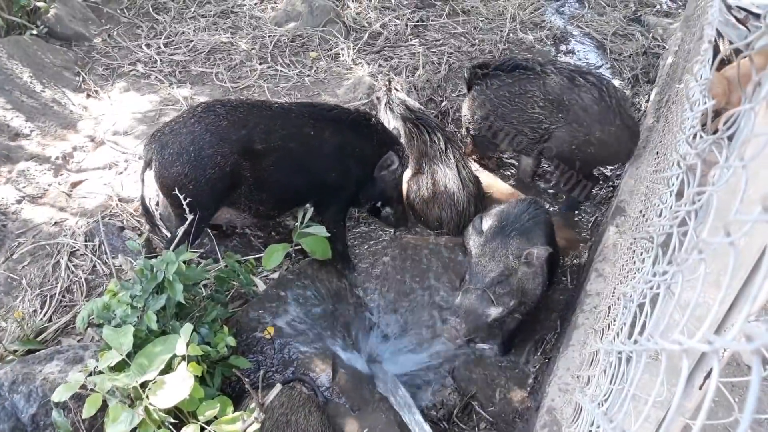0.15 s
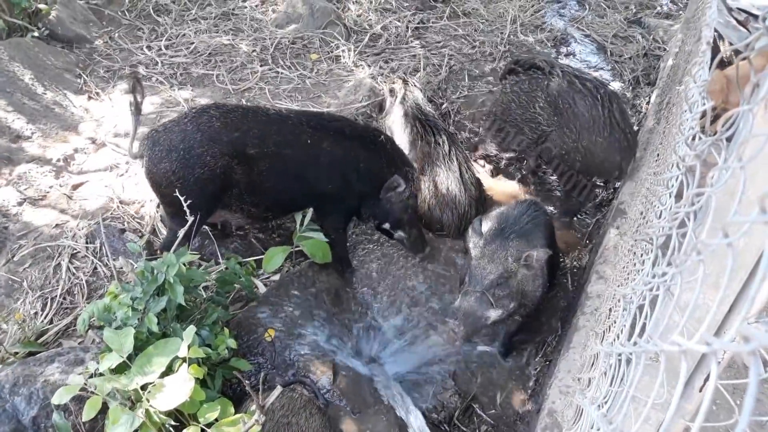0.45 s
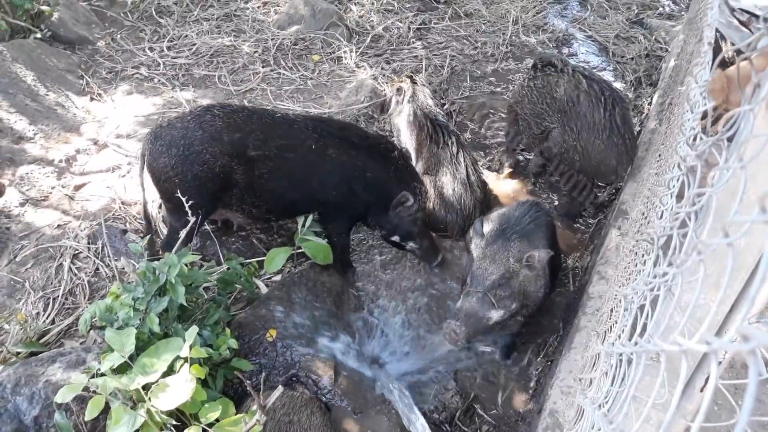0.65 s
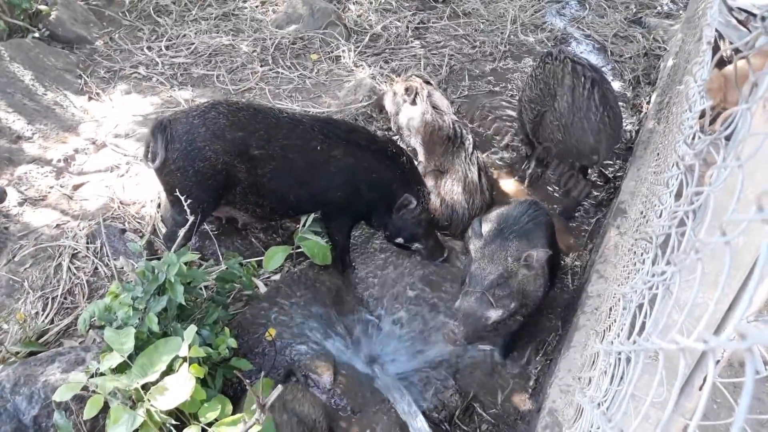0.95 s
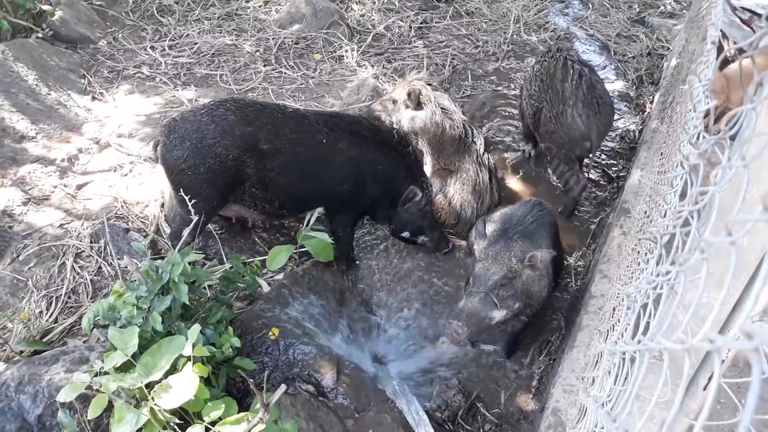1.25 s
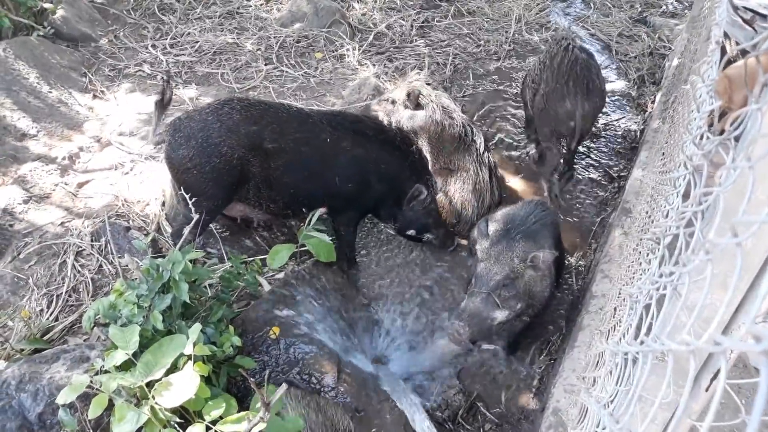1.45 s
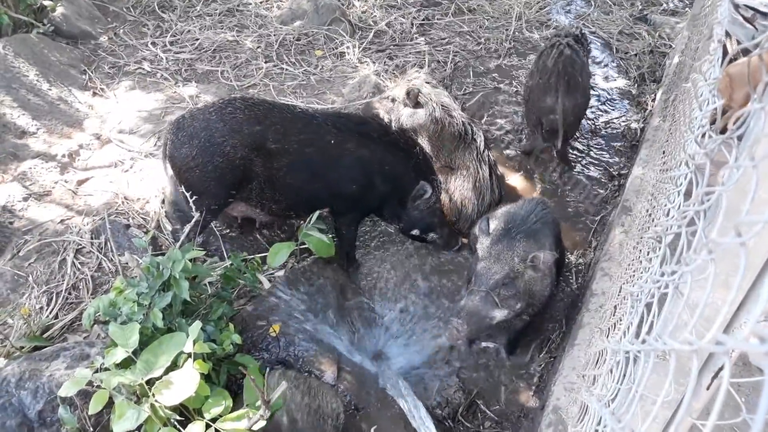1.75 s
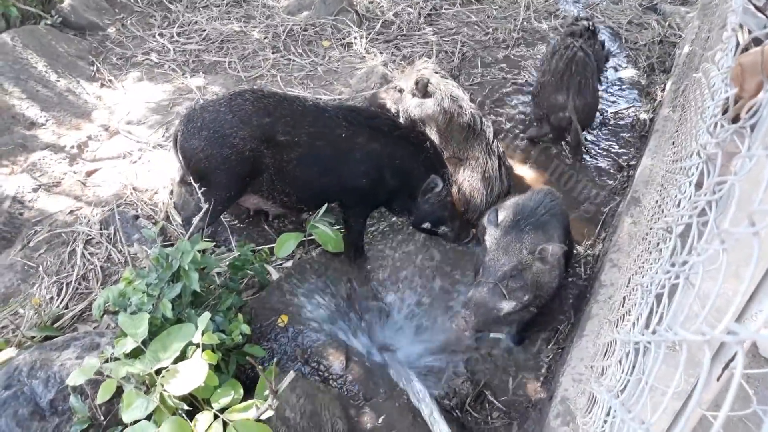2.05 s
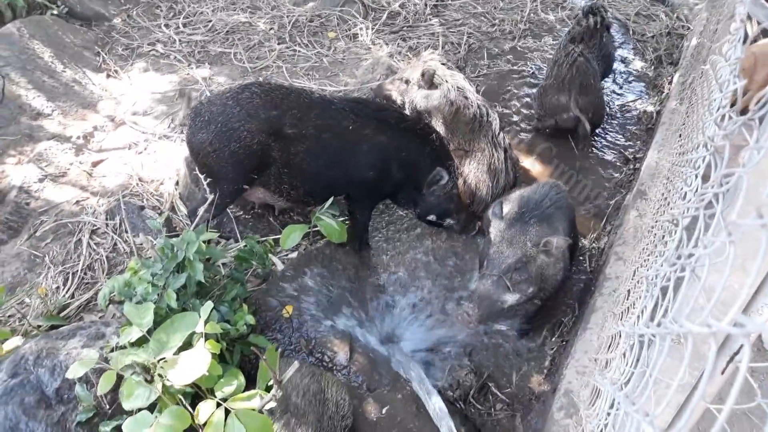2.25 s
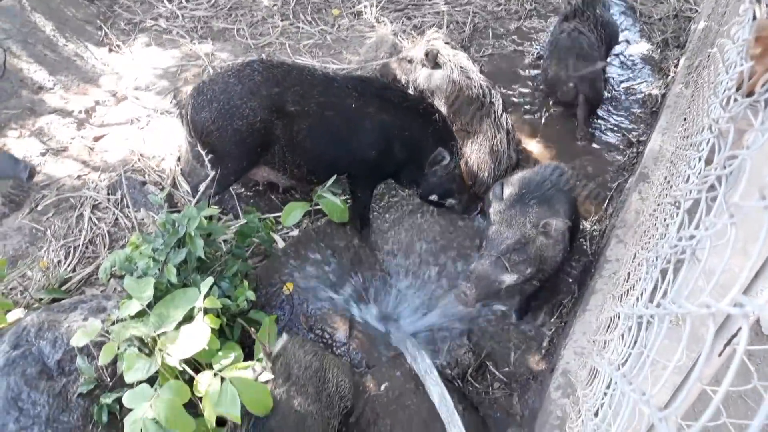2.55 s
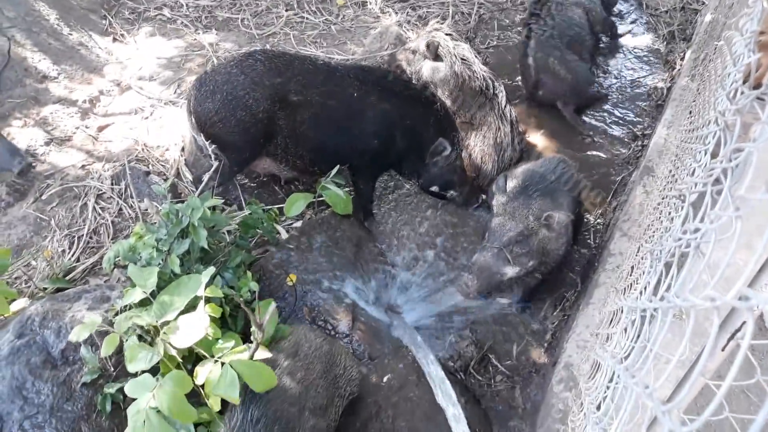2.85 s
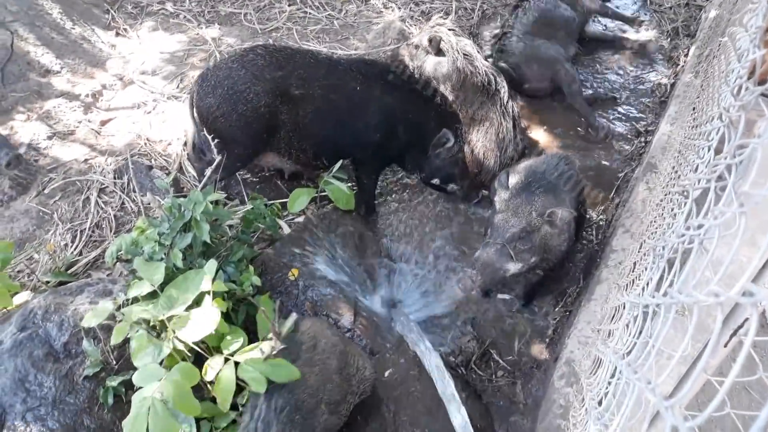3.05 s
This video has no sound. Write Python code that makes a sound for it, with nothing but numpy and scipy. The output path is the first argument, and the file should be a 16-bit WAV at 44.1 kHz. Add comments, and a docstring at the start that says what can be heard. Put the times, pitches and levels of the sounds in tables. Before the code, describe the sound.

Continuous bright water spray hisses and bubbles close by in an open pen, with irregular slaps, spits and faint plops; low wind thumps bump the small mono microphone in clusters, and one hard water smack falls near the end.

```python
"""Hose jet on wet mud and hides

An outdoor pen, heard by a single small microphone: a jet splashes on wet mud and hides.
The splash is a hiss of fine spray (flickering noise), pattering drops and small bubbles (many short tones),
with slaps, bright spits and one big smack (dying bursts of noise and tones) and low plops (climbing tones).
A gusty breeze rumbles (lumpy low noise) and thumps (single swings of sagging pitch) in the microphone's port."""
import sys
import numpy as np
from scipy import signal
from scipy.fft import rfft, irfft
from scipy.io import wavfile
from scipy.ndimage import uniform_filter1d

SR = 44100
rng = np.random.default_rng(int(sys.argv[2]) if len(sys.argv) > 2 else 0)


def convert_level_to_amplitude(level_db):
    """Map a level in decibels to its linear amplitude factor."""
    exponent = np.asarray(level_db, float) / 20
    return 10 ** exponent


def persist_wave(psi):
    """Save psi, clipped to +-1, as 16-bit WAV."""
    counts = np.round(np.clip(psi, -1, 1) * 32767).astype(np.int16)
    wavfile.write(sys.argv[1], SR, np.atleast_2d(counts).T)


N = 141120  # length in samples, 3.2 s


def evened(x):
    """Scales to rms 1."""
    return x / np.sqrt(np.mean(x ** 2) + 1e-20)


def curve(rows, column=1):
    """Reads a column of a time table at every sample, in straight lines between rows."""
    rows = np.array(rows)
    return np.interp(np.arange(N) / SR, rows[:, 0], rows[:, column])


def colour(x, points):
    """Filters by a spectrum table, in straight lines of dB over log frequency."""
    table_hz, table_db = np.transpose(points)
    hz = np.fft.rfftfreq(len(x), 1 / SR)
    gain_db = np.interp(np.log(hz + 1), np.log(table_hz + 1), table_db)
    return irfft(rfft(x) * convert_level_to_amplitude(gain_db), len(x))


def add(mix, start_s, sound):
    """Mixes a sound in at a time in seconds."""
    part = mix[max(round(start_s * SR), 0):][:len(sound)]
    part += sound[:len(part)]


def blip(hz, cycles, rise):
    """A tone that dies by 30 dB in the given cycles, while its pitch climbs by the fraction rise."""
    u = np.arange(4000) / SR * hz / cycles
    onset = 1 - np.exp(-u / 0.014)
    turns = cycles * (u + rise * u ** 2 / 2)
    return onset * convert_level_to_amplitude(-30 * u) * np.sin(2 * np.pi * turns)


def grains(per_s, spread_db, cycles, rise, lo_hz, hi_hz, count=30):
    """Many small tones at random times, of scattered size, evenly spread over count pitches."""
    happens = rng.random(N) < per_s / SR
    size = convert_level_to_amplitude(spread_db * np.minimum(rng.exponential(1, N), 4)) * happens
    kind = rng.integers(0, count, N)
    total = np.zeros(N)
    for k, hz in enumerate(np.linspace(lo_hz, hi_hz, count)):
        tone = np.sqrt(hz) * blip(hz, cycles, rise)  # shorter high tones get equal energy
        total += signal.oaconvolve(size * (kind == k), tone)[:N]
    return evened(total)


def burst(db, hz, t60, width):
    """Noise through a resonance at hz, width * hz wide, dying 60 dB in t60 seconds; db is its peak."""
    t = np.arange(3000) / SR
    r = np.exp(-np.pi * width * hz / SR)
    poles = [1, -2 * r * np.cos(2 * np.pi * hz / SR), r * r]
    ring = signal.lfilter([1, 0, -1], poles, rng.standard_normal(len(t)))
    ring = ring * np.minimum(t / 0.00049, 1) * convert_level_to_amplitude(-60 * t / t60)
    return convert_level_to_amplitude(db) * ring / np.abs(ring).max()


# How strongly the breeze rumbles in the port. Each row: time in seconds, level in dB.
RUMBLE_LEVEL = [(0, -36), (.07, -53), (.11, -57), (.27, -45.5), (.33, -47), (.5, -41), (.72, -44),
                (.77, -42), (.81, -33), (.9, -36), (.96, -50), (1.01, -37), (1.04, -36), (1.1, -44),
                (1.15, -46.5), (1.32, -45), (1.42, -40.5), (1.55, -52), (1.7, -44.5), (1.76, -54.5),
                (1.88, -60), (2.15, -44.5), (2.2, -50), (2.3, -42.5), (2.6, -44.5), (2.91, -43),
                (3.04, -32), (3.1, -39.5), (3.2, -52)]
# Spectrum of that rumble. Each row: frequency in Hz, relative noise density in dB per Hz.
RUMBLE_COLOUR = [(20, -34), (50, -4.5), (80, 2), (120, 1), (200, -7.5), (300, -13.5), (500, -20.5),
                 (900, -37)]


def wind_rumble():
    """Low noise of the breeze, swelling in short lumps and following the gusts."""
    lump_db, lump_s = 4, 0.012  # rms of the lumps, half-width of their smoothing bell
    t = np.arange(-2000, 2000) / SR
    bell = np.exp(-(t / lump_s) ** 2)
    lumps = evened(signal.oaconvolve(rng.standard_normal(N), bell, "same"))
    rumble = colour(rng.standard_normal(N), RUMBLE_COLOUR) * convert_level_to_amplitude(lump_db * lumps)
    return convert_level_to_amplitude(curve(RUMBLE_LEVEL)) * evened(rumble)


# Single thumps of wind in the port.
# Each row: middle in seconds, level in dB, pitch at the middle in Hz, width in seconds.
WIND_THUMPS = [(0.0313, -31.5, 145, 0.0082), (0.055, -33, 103, 0.0125), (0.4213, -28, 120, 0.0101),
               (0.437, -28, 129, 0.0099), (0.466, -30, 101, 0.036), (0.507, -22.5, 141, 0.0098),
               (0.5558, -33, 126, 0.013), (0.5747, -31, 161, 0.011), (0.598, -29, 190, 0.01),
               (0.654, -32, 114, 0.0052), (0.6686, -24, 175, 0.011), (0.6937, -27, 168, 0.0076),
               (0.7062, -24.5, 118, 0.019), (0.7913, -20, 147, 0.0068), (0.8097, -26, 110, 0.01),
               (0.8191, -11, 187, 0.0063), (0.825, -25, 190, 0.0035), (0.8358, -26.5, 156, 0.006),
               (0.848, -13.5, 165, 0.0029), (0.8836, -16.5, 171, 0.0047), (0.89, -21.5, 149, 0.0073),
               (0.981, -23, 150, 0.0081), (0.999, -12.5, 400, 0.0065), (1.01, -22, 90, 0.014),
               (1.0228, -14.5, 244, 0.0034), (1.034, -22, 234, 0.011), (1.0466, -22.5, 197, 0.008),
               (1.0627, -27, 120, 0.014), (1.0827, -27.8, 163, 0.0053), (1.3487, -28.5, 145, 0.0083),
               (1.3602, -34, 128, 0.0079), (1.394, -34, 175, 0.0039), (1.409, -24, 116, 0.013),
               (1.4546, -26, 178, 0.016), (1.6263, -32.5, 118, 0.013), (1.6924, -28, 148.3, 0.013),
               (2.251, -33, 120, 0.028), (2.277, -29, 151, 0.0089), (2.4238, -20.5, 144, 0.0085),
               (2.4542, -32, 124, 0.0108), (2.5141, -30.5, 114, 0.0103), (2.5297, -32.5, 132, 0.0094),
               (2.64, -22, 209, 0.011), (2.666, -24.5, 118, 0.0085), (2.752, -32, 128, 0.0064),
               (2.7784, -31, 178.4, 0.0085), (2.8084, -22, 119, 0.011), (2.8703, -26, 182, 0.012),
               (2.9349, -30, 201, 0.0072), (2.9514, -21, 149, 0.0046), (2.966, -21, 129, 0.008),
               (2.9822, -25, 116, 0.017), (2.9954, -32, 177, 0.0059), (3.006, -28.5, 127, 0.0055),
               (3.0371, -17, 147.5, 0.017), (3.0626, -18, 195, 0.0075), (3.0766, -31, 131, 0.0062)]


def wind_thumps():
    """Low swings with a steep rise, a slower fall and a sagging pitch, edged by an octave tone."""
    sag_full, full_db, sag_scatter = 0.89, -11, 0.56  # the hardest thumps sag most
    rise, fall, edge_db = 0.29, 0.63, -13.5  # widths from half height to the middle and back
    t = np.arange(-2000, 2000) / SR
    out = np.zeros(N)
    for s, db, hz, width in WIND_THUMPS:
        phase, bend = rng.random(2)
        u = t / width
        sag = sag_full * np.sqrt(convert_level_to_amplitude(db - full_db)) + sag_scatter * (bend - 0.5)
        shape = 0.5 ** ((u / np.where(u < 0, rise, fall)) ** 2)
        bent_t = t - sag * width * np.log(np.cosh(u))  # bends the pitch about its value at the middle
        turns = 2 * np.pi * (hz * bent_t + phase)
        edge = convert_level_to_amplitude(edge_db) * shape * np.sin(2 * turns)
        add(out, s + t[0], convert_level_to_amplitude(db) * shape * (np.cos(turns) + edge))
    return out


# Low plops in the puddle.
# Each row: start in seconds, level in dB, starting pitch in Hz, time to die 60 dB in seconds.
PUDDLE_PLOPS = [(0.759, -32, 813, 0.049), (1.184, -33.5, 785, 0.0403), (1.449, -35.5, 544, 0.079),
                (1.877, -41, 545, 0.046), (1.97, -36.5, 537, 0.044), (2.382, -35.5, 933, 0.047),
                (2.554, -28.5, 970, 0.044), (3.121, -36, 934, 0.052)]


def plops():
    """Ringing low tones whose pitch climbs as they die."""
    out = np.zeros(N)
    for s, db, hz, t60 in PUDDLE_PLOPS:
        add(out, s, convert_level_to_amplitude(db) * blip(hz, t60 * hz / 2, rise=0.394))
    return out


def hiss():
    """Fine spray: flat noise with drifting patches, a flicker of the whole and one of the treble."""
    patch_db, flicker_db, treble_flicker_db = 1, 1.0, 0.47  # rms; the treble's is at 8 kHz
    frames = N // 64 + 8
    real, imag, patches = rng.standard_normal((frames, 129, 3)).T
    patches = uniform_filter1d(patches, size=9, axis=0)
    patches = evened(uniform_filter1d(patches, size=14, axis=1))
    whole, treble = evened(uniform_filter1d(rng.standard_normal((frames, 2)), size=9, axis=0)).T
    high = np.clip(np.fft.rfftfreq(256, 1 / SR) / 4000 - 1, 0, 2)[:, None]  # 0 up to 4 kHz, 2 from 12 kHz
    level_db = patch_db * patches + flicker_db * whole + treble_flicker_db * high * treble
    spectrum = (real + 1j * imag) * convert_level_to_amplitude(level_db)
    return evened(signal.istft(spectrum, nperseg=256, noverlap=192)[1][:N])


def drops():
    """Pattering drops: very short tones of steady pitch."""
    return grains(per_s=3000, spread_db=5.5, cycles=5.9, rise=0, lo_hz=452, hi_hz=14680)


def bubbles():
    """Small bubbles: longer tones whose pitch climbs."""
    return grains(per_s=320, spread_db=4.0, cycles=23, rise=0.15, lo_hz=607, hi_hz=4610)


# Colour given to the splash, cut steeply above 15.6 kHz.
# Each row: frequency in Hz, relative level in dB per Hz.
SPLASH_COLOUR = [(150, -36), (290, -17.5), (500, -13.5), (670, -15.5), (900, -10), (1140, -9), (1390, -4.5),
                 (1660, -5.5), (2100, -1.5), (2300, -1.5), (2500, -4), (2820, 0), (3150, -5.5),
                 (3900, -7.5), (4800, -9), (5300, -5.5), (7000, -5.5), (8500, -2), (9200, -6),
                 (10400, -16.5), (12000, -13.5), (14300, -9), (15100, -11.5), (15650, -19), (15800, -75)]


def splash_colour(x):
    """Filters a splash sound by the colour that all but the plops share."""
    return colour(x, SPLASH_COLOUR)


# The course of the steady splash.
# Each row: time in seconds, level in dB, further gain of the treble in dB, further gain of the lows in dB.
JET_COURSE = [(0, -32, -1.5, -4.5), (.35, -32.5, 1, -4), (.65, -33, 0.5, -7), (.87, -31.5, 1, 1.5),
              (1.1, -33, 1.5, 1), (1.35, -33, -0.5, -1), (1.6, -32.5, 0, -2.5), (1.9, -32.5, 0, -1.5),
              (2.15, -33, 1, 0), (2.21, -31, -2, 5.5), (2.32, -32.5, 2.5, 2), (2.5, -31.5, 1, 4),
              (2.62, -31.5, 0.5, 3.5), (2.75, -29.5, -0.5, 2), (2.9, -32, 0, 0.5), (3.2, -33.5, 1, -2.5)]


def steady_splash():
    """Hiss, drops and bubbles in one colour, with lows, treble and top moving as the jet plays."""
    flat = convert_level_to_amplitude(-1.5) * hiss() + convert_level_to_amplitude(-9) * drops() + convert_level_to_amplitude(-14.5) * bubbles()
    bed = evened(splash_colour(flat))

    def below(hz):
        return signal.sosfiltfilt(signal.butter(2, hz, fs=SR, output="sos"), bed)

    low, below_treble, below_top = below(1050), below(4200), below(9800)
    level_db = curve(JET_COURSE)
    top_db = 0.35 * (level_db - level_db.mean())  # the top swells more than the rest
    treble = below_top + convert_level_to_amplitude(top_db) * (bed - below_top) - below_treble
    middle = below_treble - low
    low_gain, treble_gain = convert_level_to_amplitude(curve(JET_COURSE, column=3)), convert_level_to_amplitude(curve(JET_COURSE, column=2))
    return convert_level_to_amplitude(level_db) * (low_gain * low + middle + treble_gain * treble)


# Larger slaps of water. Each row: start in seconds, peak in dB before the splash colour,
# centre in Hz, time to die 60 dB in seconds.
WATER_SLAPS = [(0.0757, -17, 2550, 0.032), (0.2249, -14.5, 2870, 0.028), (0.366, -17.5, 2316, 0.026),
               (0.5128, -20, 2310, 0.025), (0.6905, -16.5, 1820, 0.022), (0.7493, -18.5, 1890, 0.024),
               (0.8645, -15, 1790, 0.023), (0.8875, -14, 1270, 0.051), (1.0943, -17, 2620, 0.043),
               (1.191, -19.5, 1470, 0.025), (1.2134, -21.5, 1320, 0.023), (1.48, -18, 2300, 0.031),
               (1.932, -19, 2830, 0.025), (2.205, -18, 2860, 0.025), (2.4842, -23, 2090, 0.022),
               (2.5558, -19, 2340, 0.028), (2.594, -11.5, 3470, 0.031), (2.6302, -14, 2800, 0.025),
               (2.9332, -21, 2940, 0.027), (2.9501, -17, 1410, 0.027)]


def slaps():
    """Sudden bursts of noise around a middle pitch."""
    out = np.zeros(N)
    for s, db, hz, t60 in WATER_SLAPS:
        add(out, s, burst(db, hz, t60, width=0.29))
    return out


# Bright spits of spray. Each row: start in seconds, peak in dB before the splash colour, centre in Hz.
SPRAY_SPITS = [(0.0756, -19, 8200), (0.534, -18, 8660), (0.7815, -17, 7670), (0.845, -18, 6690),
               (1.429, -15, 7400), (1.779, -17.5, 7200), (2.037, -17.5, 8930), (2.325, -16, 8400),
               (2.5733, -17, 8500), (2.6831, -25, 8380), (2.6905, -25, 8200), (2.699, -19, 8800),
               (2.7423, -13, 4660), (2.805, -24, 8830), (2.839, -23, 8260), (2.8574, -23, 8380),
               (2.906, -15, 8440), (3.0954, -20, 8240)]


def spits():
    """Brief bursts of noise, mostly high in the treble."""
    out = np.zeros(N)
    for s, db, hz in SPRAY_SPITS:
        add(out, s, burst(db, hz, t60=0.02, width=0.2))
    return out


# The one big smack of water. Its row: start in seconds, level in dB before the splash colour,
# rise in seconds, hold in seconds, time to die 60 dB in seconds.
BIG_SMACK = (2.7705, -14.5, .0008, .0016, .01)
# Tones it rings with. Each row: pitch in Hz, level in dB against the smack's level.
SMACK_TONES = [(2050, 0), (3550, -1), (4600, -4), (5600, -8)]


def smack():
    """A hard-edged crack with a few short tones, held for an instant, over a duller after-splash."""
    s, db, rise, hold, t60 = BIG_SMACK
    t = np.arange(3000) / SR
    tones = sum(convert_level_to_amplitude(tone_db) * np.sin(2 * np.pi * (hz * t + rng.random())) for hz, tone_db in SMACK_TONES)
    crack = convert_level_to_amplitude(-1) * rng.standard_normal(len(t))
    shape = np.minimum(t / rise, 1) * convert_level_to_amplitude(db - 60 * np.maximum(t - rise - hold, 0) / t60)
    after_splash = burst(-17, hz=1500, t60=0.06, width=0.29)
    out = np.zeros(N)
    add(out, s, shape * (tones + crack) + after_splash)
    return out


def splash():
    """The whole splash: the steady bed and the coloured hits, with plops ringing low in it."""
    hits = slaps() + spits() + smack()
    return steady_splash() + splash_colour(hits) + plops()


def scene():
    """Breeze and splash meet at one microphone, which feeds both channels."""
    mono = wind_rumble() + wind_thumps() + splash()
    return np.array([mono, mono])


def roll_off(x):
    """The treble ends steeply here."""
    return signal.sosfilt(signal.butter(12, 15850, fs=SR, output="sos"), x)


def record(dry):
    """The microphone's low cut at 45 Hz, then the finished mix."""
    low_cut = signal.butter(3, 45, "high", fs=SR, output="sos")
    mix = signal.sosfilt(low_cut, dry)
    return roll_off(mix)


dry = scene()
out = record(dry)
persist_wave(out)
```